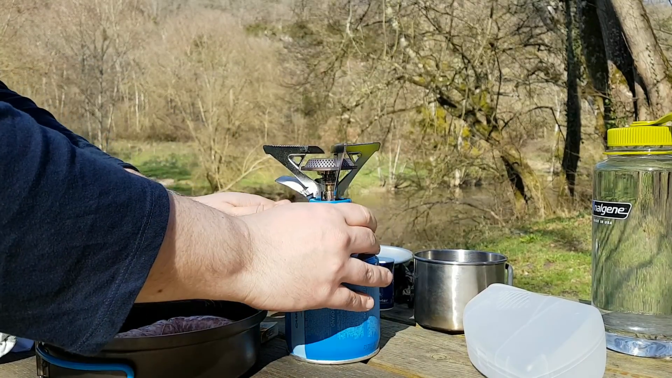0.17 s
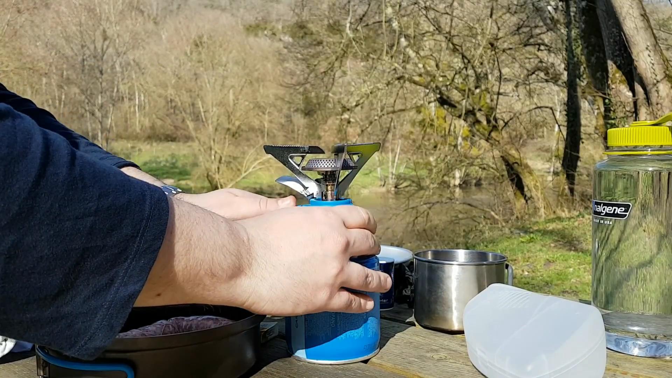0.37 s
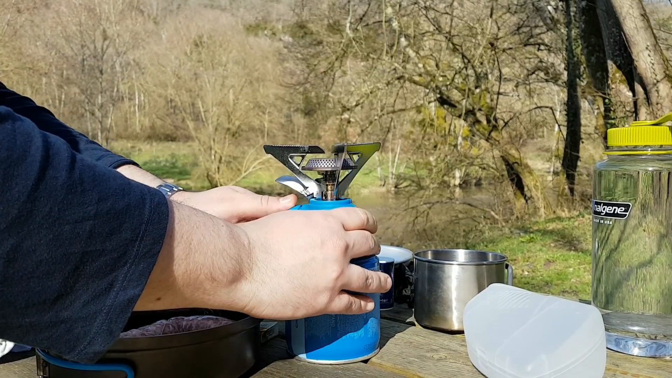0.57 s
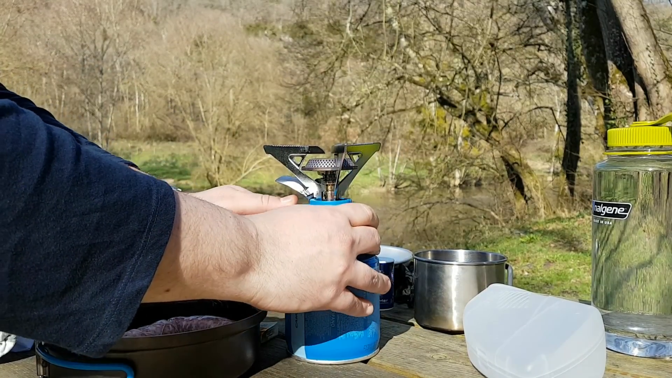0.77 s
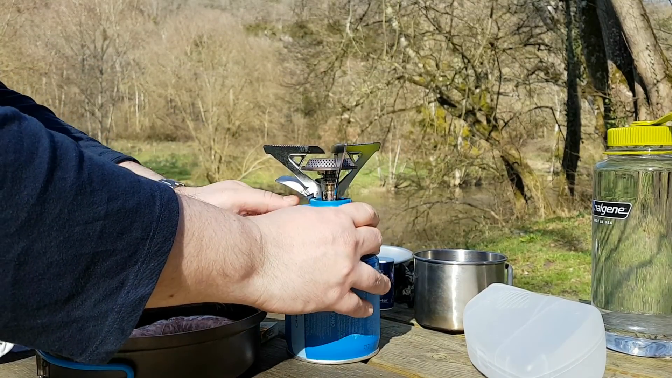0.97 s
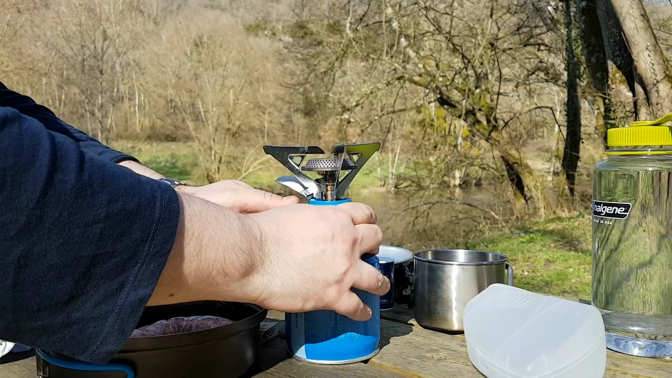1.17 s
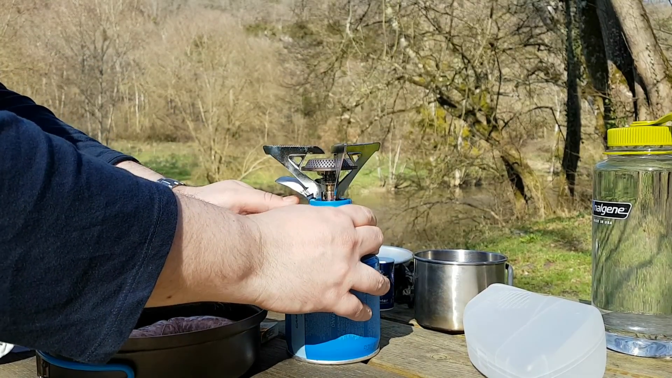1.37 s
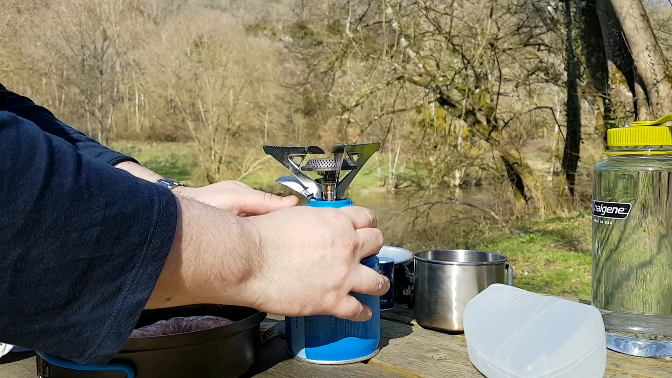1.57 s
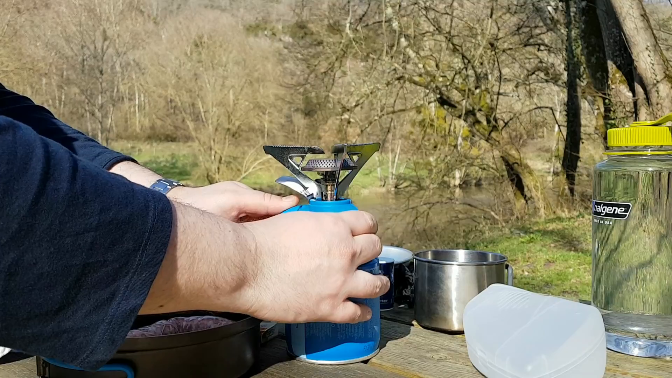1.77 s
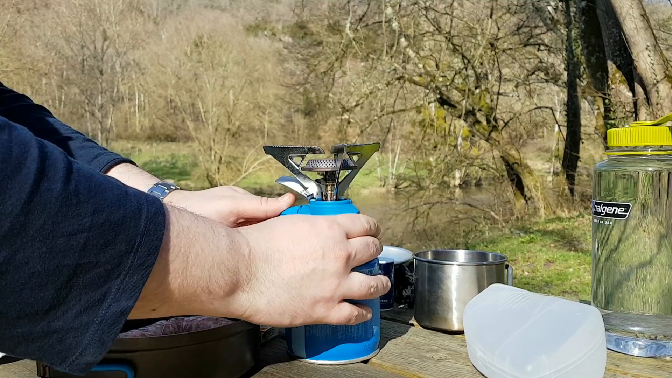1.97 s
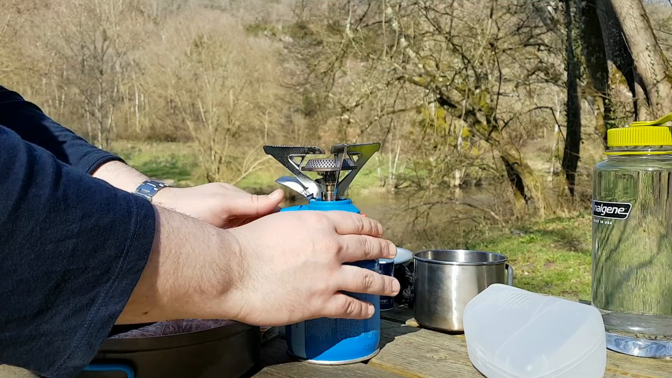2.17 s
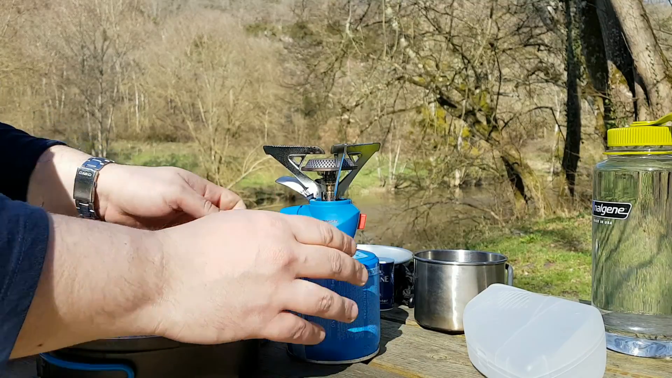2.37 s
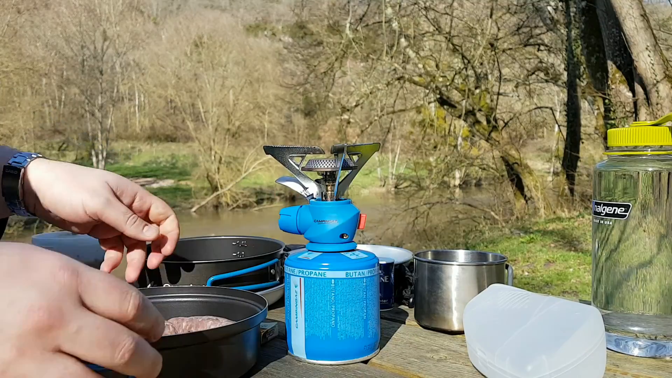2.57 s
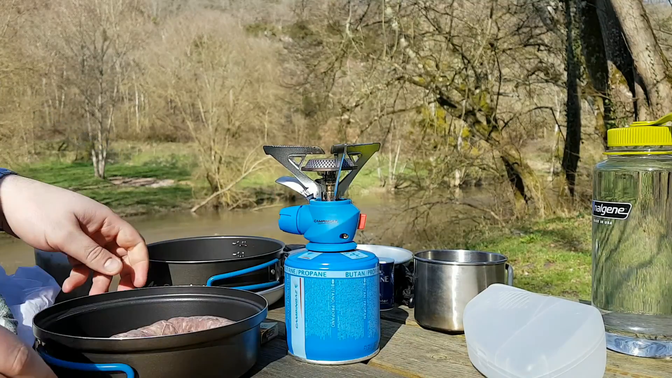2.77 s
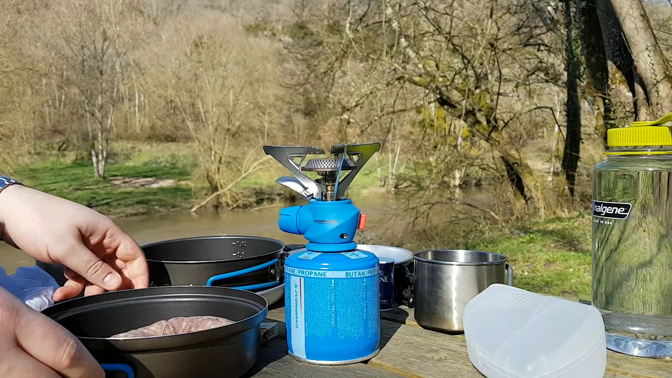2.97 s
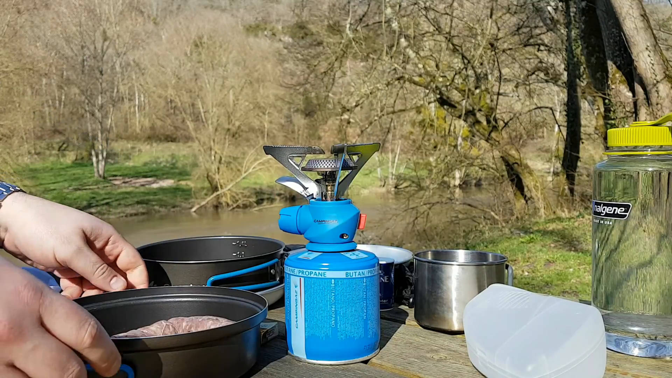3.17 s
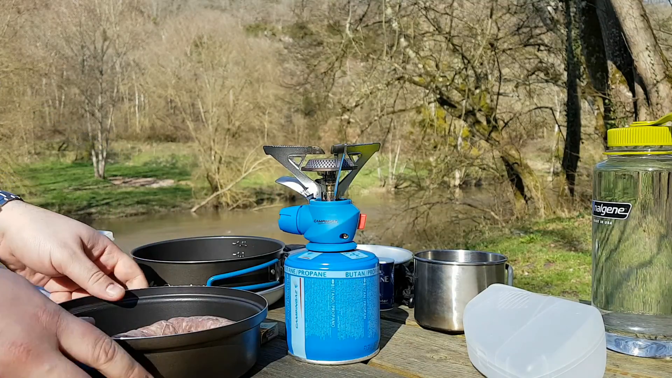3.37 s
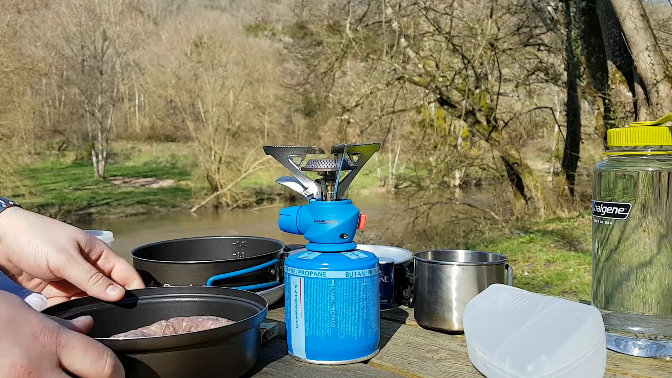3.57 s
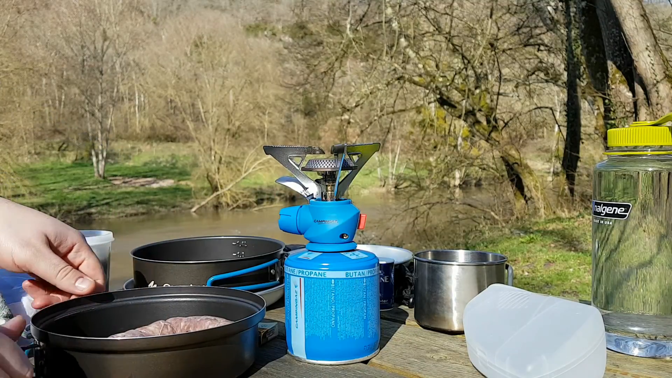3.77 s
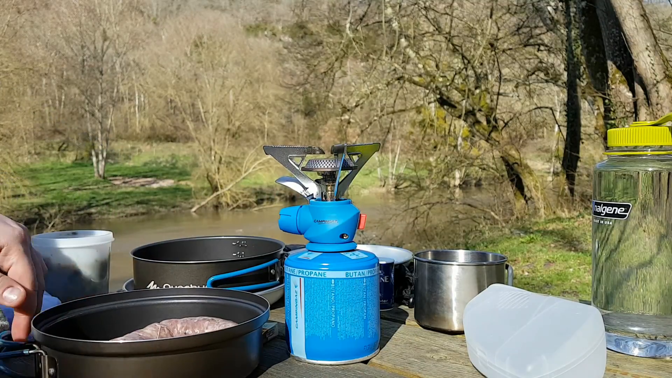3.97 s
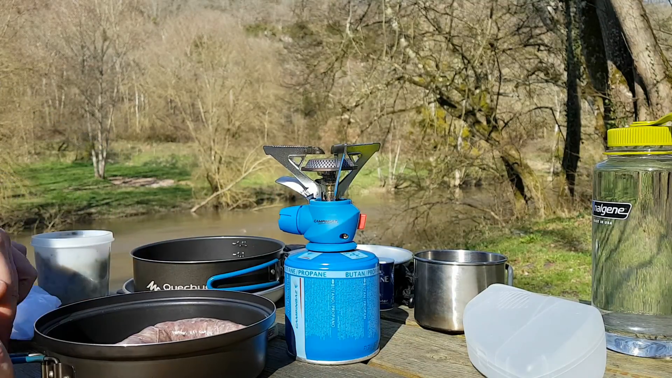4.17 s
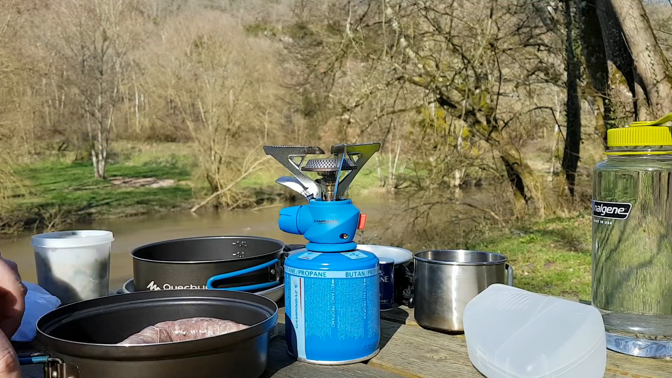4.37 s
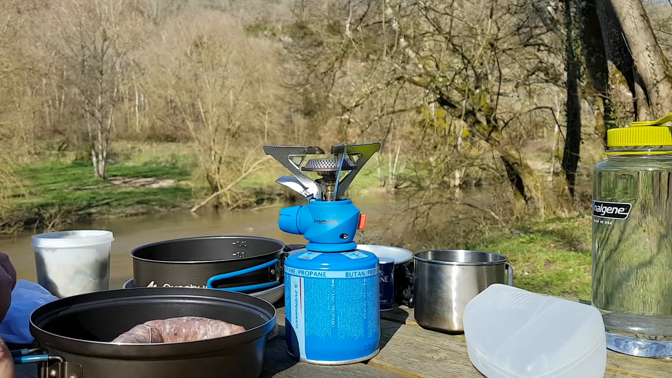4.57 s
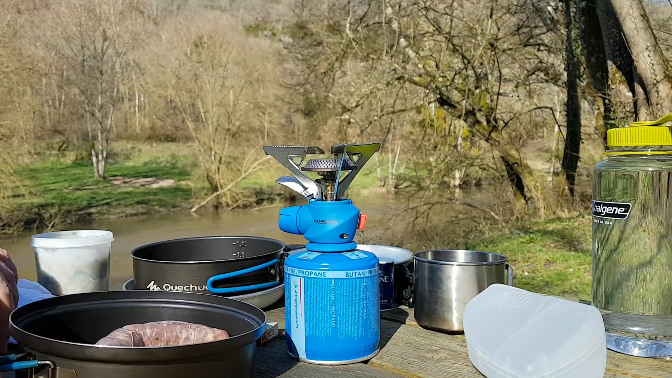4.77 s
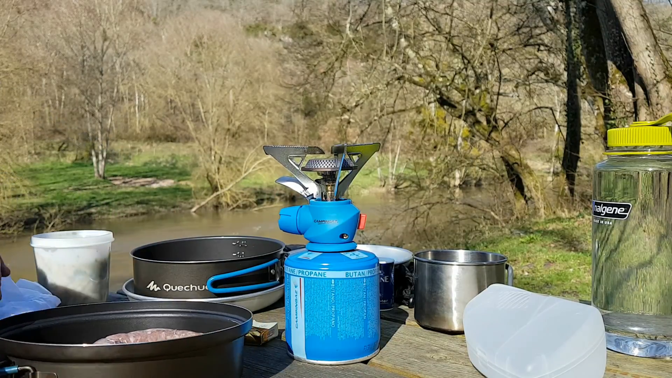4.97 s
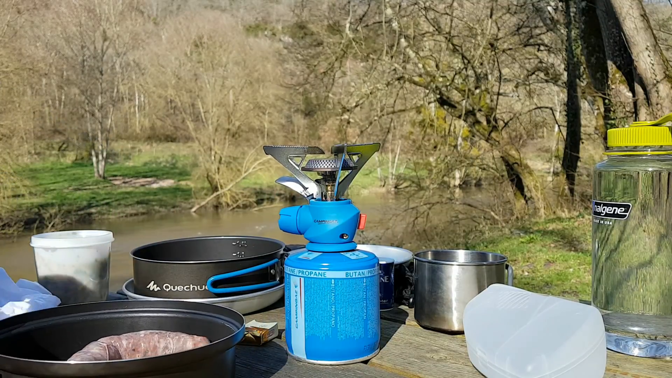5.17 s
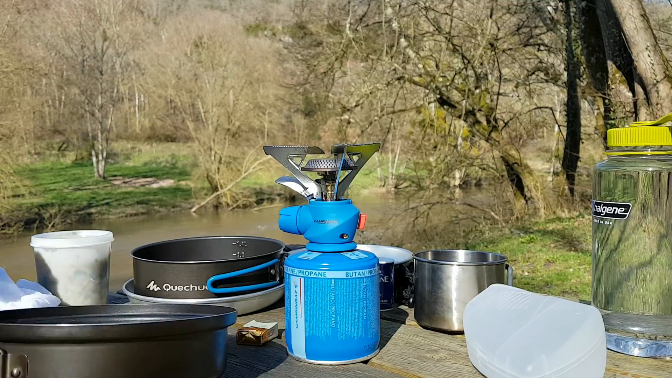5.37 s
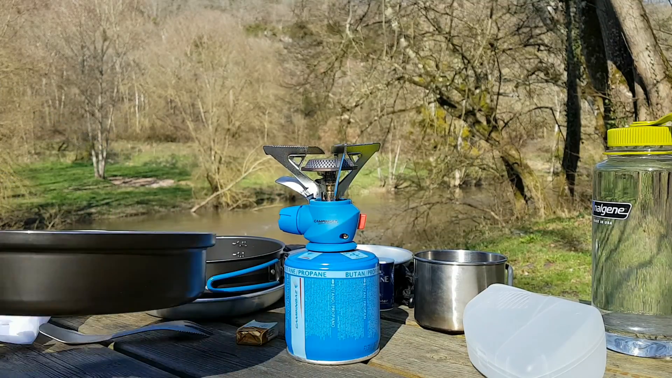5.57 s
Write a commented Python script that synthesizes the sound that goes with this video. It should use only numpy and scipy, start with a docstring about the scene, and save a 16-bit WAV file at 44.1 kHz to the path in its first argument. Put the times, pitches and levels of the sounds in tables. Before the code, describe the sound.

A gas stove starts to hiss, a sharp igniter snap lights it with a low roar, then pans tick, clink and knock on a wooden table.

```python
"""Camping stove by a river

A gas stove hisses from shaped noise, the igniter snaps and a second, low noise roars until the flame is
turned down. Snaps, pan clinks, handle ticks, table knocks and soft bumps are noise bursts with decaying
sines; scrapes are grainy noise. Small birds call in gliding sines with an echo, over a steady noise bed.
"""
import sys
import numpy as np
from scipy import signal
from scipy.fft import rfft, irfft
from scipy.io import wavfile
from scipy.ndimage import uniform_filter1d

SR = 44100
rng = np.random.default_rng(int(sys.argv[2]) if len(sys.argv) > 2 else 0)


def generate_wav(sig):
    """Save sig (samples, or channels by samples) to the path in sys.argv[1] as 16-bit PCM at SR."""
    pcm = np.round(np.clip(np.atleast_2d(sig).T, -1, 1) * 32767).astype(np.int16)
    wavfile.write(sys.argv[1], SR, pcm)


N = 248283


def gain_of(db):
    """Turns decibels into an amplitude factor."""
    return 10 ** (np.asarray(db) / 20)


def evened(x):
    """Scales a signal to an rms of 1."""
    return x / np.sqrt(np.mean(x ** 2) + 1e-20)


def read(points, hz):
    """Reads a spectrum table on a log-frequency axis."""
    f, value = np.transpose(points)
    return np.interp(np.log(hz + 1), np.log(f + 1), value)


def along(rows):
    """Reads a time curve at every sample."""
    s, value = np.transpose(rows)
    return np.interp(np.arange(N) / SR, s, value)


def add(mix, s, sound):
    """Mixes a stereo sound in, starting at s seconds."""
    part = mix[:, round(s * SR):][:, :sound.shape[1]]
    part += sound[:, :part.shape[1]]


def noise(colour, likeness, pan, patchy_db, flicker_db, lag_s=0, peaks=()):
    """Stereo noise from random short-time spectra, with drifting patches and a flicker shared by all pitches."""
    frames, hz = N // 256 + 5, np.fft.rfftfreq(1024, 1 / SR)
    a, b, c, d, patches = rng.standard_normal((frames, 513, 5)).T
    patches = uniform_filter1d(patches, size=10, axis=0)  # smooth over pitch
    patches = evened(uniform_filter1d(patches, size=12, axis=1))  # and over time
    flicker = evened(uniform_filter1d(rng.standard_normal(frames), size=6))
    colour_db = read(colour, hz)
    for f, width, top_db in peaks:
        colour_db = colour_db + top_db / (1 + (2 * (hz - f) / width) ** 2)
    same = read(likeness, hz)[:, None]
    left = a + 1j * b
    right = same * left + np.sqrt(1 - same ** 2) * (c + 1j * d)
    side = gain_of(-read(pan, hz)) * np.exp(-2j * np.pi * hz * lag_s)  # right is scaled and late
    level_db = colour_db[:, None] + patchy_db * patches + flicker_db * flicker
    spectra = np.array([left, right * side[:, None]]) * gain_of(level_db)
    return evened(signal.istft(spectra, nperseg=1024, noverlap=768)[1][:, :N])


# Stereo tilt of near blows and scrapes, as the ports hear them unequally.
# Each row: pitch in Hz, left over right in dB.
PORT_TILT = [(500, -1), (2500, -2.5), (6000, -.5), (11000, 6), (16000, 6)]


def blow(row, crack, body, modes, crack_t60, crack_db, rise_s, same, lag_s):
    """A noise burst and quick contact ring, reaching the right late, then the long ring of the object."""
    s, peak_db, ring_db, pan_db, bright_db = row
    t, hz = np.arange(SR // 2) / SR, np.fft.rfftfreq(SR // 2, 1 / SR)
    rise = np.minimum(t / rise_s, 1) ** 2  # the contact force builds
    after = np.maximum(t - rise_s, 0)  # then lets go
    u, v = rng.standard_normal((2, SR // 2))
    burst = np.array([u, same * u + np.sqrt(1 - same ** 2) * v])
    burst = evened(irfft(rfft(burst) * gain_of(read(crack, hz))))
    contact = sum(gain_of(db) * np.exp(-np.pi * width * after) * np.sin(2 * np.pi * f * t)
                  for f, width, db in body)
    fade = gain_of(-60 * after / crack_t60)
    fade += gain_of(-25 - 60 * after / 0.15)  # table and pots scatter a weak tail
    attack = rise * (contact / abs(contact).max() + gain_of(crack_db) * fade * burst)
    late = np.exp(-2j * np.pi * hz * np.array([[0], [lag_s]]))
    phases = .4 * rng.standard_normal((len(modes), 2, 1))  # each mode radiates a little unevenly
    ring = sum(gain_of(db - 60 * t / t60) * np.sin(2 * np.pi * f * t + phase)
               for (f, db, t60), phase in zip(modes, phases))
    sound = rfft(attack / abs(attack).max()) * late + rfft(gain_of(ring_db) * rise * ring)
    sides = np.array([[.5], [-.5]]) * (pan_db + read(PORT_TILT, hz))
    colour = gain_of(bright_db * np.log2(hz / 2000 + 0.16) + sides)
    colour *= hz ** 2 / (hz ** 2 + 200 ** 2)  # small objects radiate no deep bass
    delay = np.exp(-2j * np.pi * hz * 0.0018)  # with the 3 ms lead, the rise starts 1.2 ms early
    return s - .003, gain_of(peak_db) * irfft(sound * colour * delay)


def blows(rows, *tables, **settings):
    """Lays a series of separate blows on one stereo track."""
    track = np.zeros((2, N))
    for row in rows:
        add(track, *blow(row, *tables, **settings))
    return track


# Broad gas hiss at the nozzle. Each row: pitch in Hz, relative density in dB per Hz.
NOZZLE_HISS = [(530, -8), (900, -8), (1460, -6), (2040, -4), (3380, -7), (4010, -4.5), (4740, -17),
               (7960, -25), (9420, -29.5), (16000, -18)]
# Mixing tube resonances. Each row: pitch in Hz, width in Hz, boost in dB.
TUBE_PEAKS = [(2380, 880, -7.5), (3970, 180, 3), (5200, 400, -1), (6020, 560, 7.5), (6670, 510, 8.5),
              (7870, 580, 7.5), (8380, 720, 7), (10780, 1300, 8)]
# Low flame roar. Each row: pitch in Hz, relative density in dB per Hz.
FLAME_ROAR = [(15, -66), (25, -13), (59, -28), (124, 1.5), (204, 2.5), (357, -6.5), (515, -5), (1050, -24),
              (1230, -23.5), (1490, -33.5), (2500, -26.5), (3250, -35.5), (5500, -120)]
# Stereo image of the stove. Each row: pitch in Hz, left-right likeness from 0 to 1.
STOVE_LIKENESS = [(60, 0.98), (180, 1), (550, 0.96), (1650, 0.65), (4970, 0.58), (15000, 0.43)]
# Stereo balance of the stove. Each row: pitch in Hz, left over right in dB.
STOVE_BALANCE = [(60, 0.0), (180, 0.25), (550, -2.3), (1650, -2.2), (4970, -2.3), (15000, 2.3)]
# The valve is opened in two turns, then set back. Each row: time in seconds, gas flow in dB re full.
VALVE_FLOW = [(.3, -16), (.47, -13), (.62, -6), (1.0, -5.5), (1.1, -1), (1.33, -1), (1.4, 0.5), (2.17, 0.5),
              (2.27, -4.5), (5.63, -4.5)]
HISS_DB, ROAR_DB = -55, -38  # at full flow, the roar before flare and settling
ROAR_PER_DB = 1.39  # the roar follows the flow more steeply
LIT_S, FLARE_DB, FLARE_S = 1.34, 6.5, 0.017  # the gathered gas burns off in a short flare
SETTLE_DB, SETTLE_S = -2, 1  # the flame calms as the burner warms


def stove():
    """Gas whistles faintly through the mixing tube; once lit, the turbulent flame adds a lumpy low roar."""
    hiss = noise(NOZZLE_HISS, STOVE_LIKENESS, STOVE_BALANCE, patchy_db=0.65, flicker_db=0.7,
                 lag_s=.00003, peaks=TUBE_PEAKS)
    roar = noise(FLAME_ROAR, STOVE_LIKENESS, STOVE_BALANCE, patchy_db=1.17, flicker_db=0.73, lag_s=.00003)
    flow_db = along(VALVE_FLOW)
    since_lit = np.arange(N) / SR - LIT_S
    burning = np.maximum(since_lit, 0)
    flare_db = FLARE_DB * np.exp(-burning / FLARE_S)
    settle_db = SETTLE_DB * (1 - np.exp(-burning / SETTLE_S))
    flame = gain_of(ROAR_DB + ROAR_PER_DB * flow_db + flare_db + settle_db) * roar
    return gain_of(HISS_DB + flow_db) * hiss + (since_lit > 0) * flame


# Igniter button snaps. Each row: time in seconds, attack peak in dB before colouring, ring in dB
# re the attack, left over right in dB before the port tilt, brightness in dB per octave.
IGNITER_SNAPS = [(1.0782, -35.5, -26, -1, -10), (1.334, -6.5, -22.5, -0.7, 2),
                 (1.8165, -24, -24, -2.5, 0.1)]
# Snap noise. Each row: pitch in Hz, relative density in dB per Hz.
IGNITER_CRACK = [(290, -58), (500, -40), (1120, -1), (1840, -4), (2730, -12), (3820, -9), (4970, -21),
                 (7710, -16.5), (9330, -37), (10300, -26), (12500, -40), (15800, -30), (16500, -45)]
# Plastic housing. Each row: pitch in Hz, width in Hz, relative level in dB.
IGNITER_HOUSING = [(1340, 130, -3), (1700, 150, 0), (2210, 180, -2), (2750, 300, -10), (3700, 350, -9),
                   (5300, 400, -12), (6300, 400, -11), (7700, 500, -14), (10300, 500, -13),
                   (12300, 500, -9)]
# Stove body modes. Each row: pitch in Hz, relative level in dB, t60 in seconds.
STOVE_MODES = [(1432, -4, .2), (1577, -8, .14), (2449, -12, .1), (2730, -1, .08), (6955, -26, 1.7),
               (10910, -25, .11), (11230, -26, .07), (13450, -32, .1), (15610, -11, .069),
               (15650, -45, 1.2)]


def igniter():
    """The spring igniter snaps in its plastic housing and sets the stove body ringing."""
    return blows(IGNITER_SNAPS, IGNITER_CRACK, IGNITER_HOUSING, STOVE_MODES,
                 crack_t60=.017, crack_db=-9, rise_s=.0021, same=.3, lag_s=.00003)


# The gas cloud catches. One row: time in seconds, level in dB of the unwindowed cycle, pitch in Hz.
GAS_CATCH = (1.3417, -27, 170)


def whump():
    """One soft low push of air: a single cycle, suction first."""
    s, level_db, hz = GAS_CATCH
    turns = np.arange(0, 1, hz / SR)
    push = -np.sin(2 * np.pi * turns) * signal.windows.tukey(len(turns), .5)
    return s, np.ones((2, 1)) * gain_of(level_db) * push


# Pan clinks. Each row: time in seconds, attack peak in dB before colouring, ring in dB
# re the attack, left over right in dB before the port tilt, brightness in dB per octave.
PAN_CLINKS = [(4.9524, -10.5, -19.5, -0.5, 1.0), (4.9534, -11, -40, -0.5, 1.5)]
# Clink noise. Each row: pitch in Hz, relative density in dB per Hz.
PAN_CRACK = [(240, -43), (400, -17), (1030, -7), (1500, -15), (2110, -11), (2930, -4.5), (5730, -15),
             (6390, -4), (8320, -16), (10200, -9.5), (11000, -18), (11900, -16), (15300, -15), (16500, -36)]
# Quick ring of the contact. Each row: pitch in Hz, width in Hz, relative level in dB.
PAN_CONTACT = [(1053, 190, 9), (2850, 500, 22.5), (6300, 350, 5), (10830, 220, 6), (13280, 490, 13),
               (12020, 300, 11.5), (15400, 300, 18)]
# Pan modes. Each row: pitch in Hz, relative level in dB, t60 in seconds.
PAN_MODES = [(2727, -7, .06), (2869, -5, .17), (3047, -13, .26), (3311, -9, .14), (3984, -4, .03),
             (4716, -26, .1), (5362, -28, .1), (6665, -30, .1), (7429, -8, .07), (8979, -17, .19),
             (9792, -22, .13), (10630, -15, .06), (14320, -32, .1), (15340, -32, .1)]


def pan_clinks():
    """The pan is struck: a bright contact, then its short metal modes."""
    return blows(PAN_CLINKS, PAN_CRACK, PAN_CONTACT, PAN_MODES,
                 crack_t60=.016, crack_db=-7, rise_s=.0018, same=.5, lag_s=.00009)


# Knocks on the table, and at 5.003 and 5.02 s soft low bumps of the dragged pan.
# Each row: time in seconds, attack peak in dB before colouring, ring in dB re the attack,
# left over right in dB before the port tilt, brightness in dB per octave.
KNOCKS_AND_BUMPS = [(4.9525, -26, -7.5, 1, 2), (5.003, -43.5, -2, -3, -4), (5.02, -42, -4, -5, -2),
                    (5.138, -26, -12.5, 1, -1), (5.2102, -34.5, -19, 0, -6.5), (5.2207, -42, -16, -1, -4),
                    (5.517, -13.5, -10.5, 0.5, -0.3)]
# Noise of the contact. Each row: pitch in Hz, relative density in dB per Hz.
TABLE_CRACK = [(120, -39), (200, -6.5), (1110, -6.5), (1320, -26), (1920, -19.5), (3440, -31), (5460, -36),
               (7950, -48), (9280, -57), (12000, -44), (15600, -91), (22000, -120)]
# Quick ring of the contact. Each row: pitch in Hz, width in Hz, relative level in dB.
TABLE_CONTACT = [(410, 70, 1), (1035, 144, 18), (1150, 260, -11), (1500, 300, -17)]
# Table modes. Each row: pitch in Hz, relative level in dB, t60 in seconds.
TABLE_MODES = [(407, 6.5, 0.031), (514, -5, 0.11), (956, 2.5, 0.05), (1130, -19, 0.036), (1208, 0, 0.03),
               (1477, -15, 0.063)]


def knocks_and_bumps():
    """The pan knocks and bumps on the wood: a duller contact over low, quickly damped modes."""
    return blows(KNOCKS_AND_BUMPS, TABLE_CRACK, TABLE_CONTACT, TABLE_MODES,
                 crack_t60=.02, crack_db=-12, rise_s=.002, same=.7, lag_s=.00016)


# Folding handle ticks. Each row: time in seconds, attack peak in dB before colouring, ring in dB
# re the attack, left over right in dB before the port tilt, brightness in dB per octave.
HANDLE_TICKS = [(3.928, -39, -24, 1, -6), (3.9796, -39, -18, -2, -4), (4.0004, -18.5, -27.5, 0, -0.5),
                (4.061, -46, -16, -3, -6), (4.181, -35.5, -11.5, 5, 2), (4.27, -52, -7, 4, -3),
                (4.3896, -42.5, -7, 2, 2)]
# Tick noise. Each row: pitch in Hz, relative density in dB per Hz.
HANDLE_CRACK = [(290, -36), (500, -3), (1920, 2), (3350, -11), (3770, -17), (5510, 0), (6100, -23),
                (6660, -3), (7710, -4), (12900, -19), (16500, -32)]
# Quick ring of the contact. Each row: pitch in Hz, width in Hz, relative level in dB.
HANDLE_CONTACT = [(1800, 480, -10), (4060, 560, -5), (6450, 180, -1), (12140, 800, 7)]
# Handle modes. Each row: pitch in Hz, relative level in dB, t60 in seconds.
HANDLE_MODES = [(1120, 1, 0.048), (1810, 9, 0.031), (2526, -15, 0.068), (2770, 3.5, 0.032),
                (3280, -9, 0.05), (4070, 6, 0.013)]


def handle_ticks():
    """The folding handle ticks: a sharp contact and small, short-lived modes."""
    return blows(HANDLE_TICKS, HANDLE_CRACK, HANDLE_CONTACT, HANDLE_MODES,
                 crack_t60=.014, crack_db=-4, rise_s=.001, same=.5, lag_s=.00013)


# The pan is dragged and scraped. Each row: start in seconds, length in seconds, level in dB at the
# start of the slide, brightness from 0 (wood) to 1 (metal).
PAN_SCRAPES = [(3.793, 0.046, -46.5, 0.53), (3.971, 0.27, -47, 0.11), (3.99, 0.028, -36.5, 0.76),
               (4.148, 0.056, -59, 0.6), (4.95, 0.097, -48, 0.2), (5.184, 0.14, -56.5, 0)]
# Dull scrape on wood. Each row: pitch in Hz, relative density in dB per Hz.
WOOD_SCRAPE = [(250, -33), (600, 6), (1000, 3.5), (2000, -3.5), (4000, -17), (8000, -16.5), (16000, -56)]
# Bright scratch. Each row: pitch in Hz, relative density in dB per Hz.
METAL_SCRATCH = [(500, -25), (2000, -4), (5300, -2.5), (8000, -18), (11000, -8), (16000, -14)]
# Metal rubbing on metal. Each row: pitch in Hz, width in Hz, boost in dB.
METAL_PEAKS = [(3240, 250, 12), (5330, 140, 11.5), (8150, 370, 20), (10760, 330, 11), (12700, 400, 7),
               (15300, 400, 3)]
GRIP_S, SLIDE_DB, LET_GO_S = 0.016, -2.5, 0.014  # a scrape grips, weakens along its length and dies away


def drag():
    """Grainy friction noise, dull on wood or ringing on metal."""
    likeness = [(100, 0.65), (16000, 0.1)]
    grain = gain_of(1.8 * evened(uniform_filter1d(rng.standard_normal(N), size=90)))
    wood = noise(WOOD_SCRAPE, likeness, PORT_TILT, patchy_db=2.5, flicker_db=2.5, lag_s=0.00013)
    metal = noise(METAL_SCRATCH, likeness, PORT_TILT, patchy_db=3, flicker_db=2.5,
                  lag_s=.00015, peaks=METAL_PEAKS)
    on_wood, on_metal = np.zeros((2, N))
    for start, length, db, bright in PAN_SCRAPES:
        t = np.arange(N) / SR - start
        push = np.clip(t / GRIP_S, 0, 1) ** 2 * np.exp(-np.maximum(t - length, 0) / LET_GO_S)
        push *= gain_of(db + SLIDE_DB * np.clip(t / length, 0, 1))
        on_wood += (1 - bright) * push
        on_metal += bright * push
    return evened(grain) * (on_wood * wood + on_metal * metal)


# Bird notes, and at 4.39 s a faint held echo of the call before it.
# Each row: start in seconds, length in seconds, first pitch in Hz, last pitch in Hz,
# lateness of the glide as a power, arch above it in Hz, level in dB before the swell.
CALLS_AND_HELD_ECHO = [(3.389, 0.07, 4200, 4620, .3, 240, -65), (3.675, .033, 4450, 4630, 0.56, 500, -62),
                       (3.718, .023, 5550, 4300, 2.2, 52, -65), (4.318, .118, 4990, 4100, 4.2, 60, -63),
                       (4.39, 0.1, 5000, 4980, 1.0, 5, -72), (4.52, .045, 4050, 4900, 0.52, 20, -69),
                       (4.633, .048, 7050, 5950, .65, -20, -74), (5.057, .092, 5080, 4150, 2.2, 130, -67)]
SWELL_DB = 1  # each whistle gains this along its length, under its fades
ECHO_DB, ECHO_T60 = -4, .6  # the trees answer; t60 in seconds


def birds():
    """Thin whistles that glide along an arch, with a soft echo from the trees."""
    calls = np.zeros((2, N))
    for start, length, first_hz, last_hz, lateness, arch_hz, db in CALLS_AND_HELD_ECHO:
        u = np.arange(0, length, 1 / SR) / length
        glide = first_hz + (last_hz - first_hz) * u ** lateness
        hz = glide + arch_hz * (1 - (2 * u - 1) ** 2)
        whistle = np.sin(2 * np.pi * np.cumsum(hz) / SR) * signal.windows.tukey(len(u), .5)
        sides_db = np.array([[-.5], [.5]])  # a little to the right
        add(calls, start, whistle * gain_of(db + SWELL_DB * u ** 2 + sides_db))
    t = np.arange(SR // 5) / SR
    echo = rng.standard_normal((2, len(t))) * gain_of(-60 * t / ECHO_T60)
    echo /= np.linalg.norm(echo[0])
    return calls + gain_of(ECHO_DB) * signal.oaconvolve(calls, echo, axes=1)[:, :N]


# River, far traffic and microphone hiss. Each row: pitch in Hz, relative density in dB per Hz.
OUTDOOR_AIR = [(12, -32), (20, -12), (27, -6), (120, -24), (158, 2.5), (187, -13), (422, -11), (527, -11),
               (574, -12), (642, -11), (2460, -19.5), (3630, -30), (7000, -41), (16000, -43)]
# Stereo image of the air. Each row: pitch in Hz, left-right likeness from 0 to 1.
AIR_LIKENESS = [(60, 0.55), (240, 1), (950, 0.66), (3770, 0.21), (15000, .1)]
AIR_DB = -54


def outdoor_air():
    """River, far traffic and microphone hiss as one bed of wide, gently flickering noise."""
    balance = [(100, -0.56), (16000, -0.63)]
    return gain_of(AIR_DB) * noise(OUTDOOR_AIR, AIR_LIKENESS, balance,
                                   patchy_db=1.64, flicker_db=1.0, lag_s=0.00038)


def scene():
    """All sources over the outdoor air."""
    mix = stove() + igniter()
    add(mix, *whump())
    mix += pan_clinks() + knocks_and_bumps() + handle_ticks() + drag()
    return mix + birds() + outdoor_air()


def record(dry):
    """The deep bass is thinned, the top stops near 16 kHz, and a small constant offset remains."""
    thin = signal.sosfilt(signal.butter(2, 60, "high", fs=SR, output="sos"), dry)
    top_cut = signal.firwin(511, 16000, window=("kaiser", 9), fs=SR)
    return signal.oaconvolve(thin, top_cut[None], "same") - .0006


dry = scene()
out = record(dry)
generate_wav(out)
```